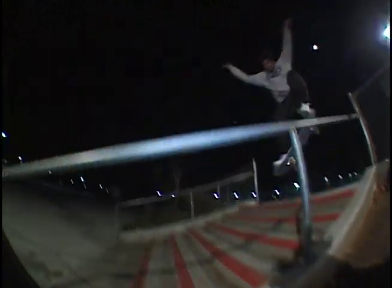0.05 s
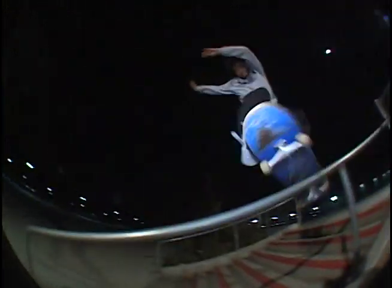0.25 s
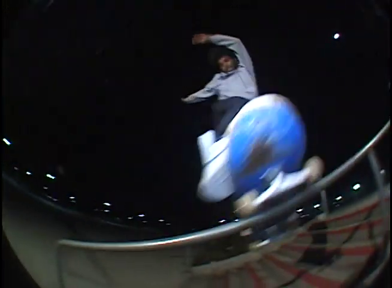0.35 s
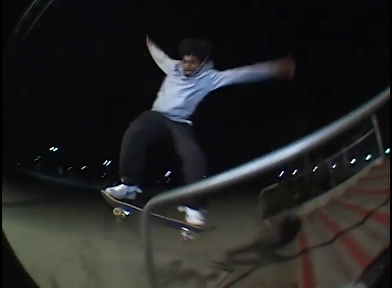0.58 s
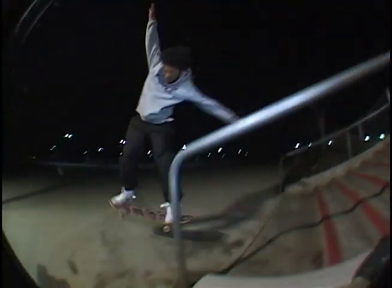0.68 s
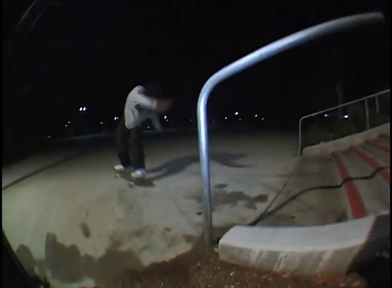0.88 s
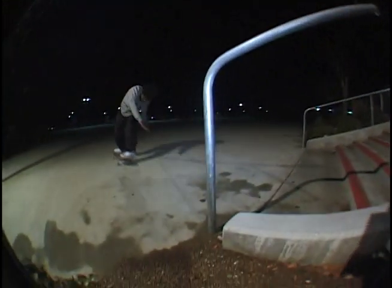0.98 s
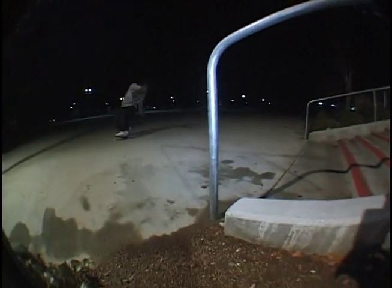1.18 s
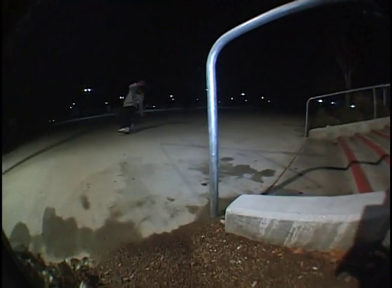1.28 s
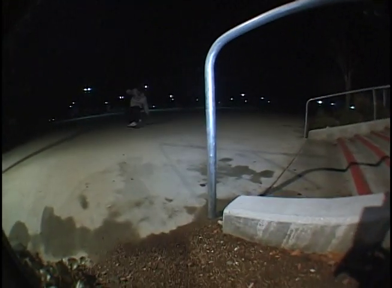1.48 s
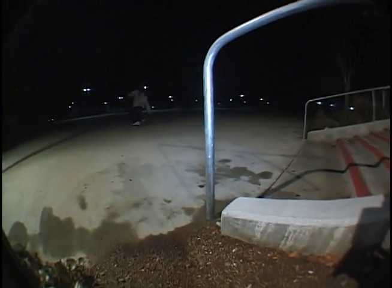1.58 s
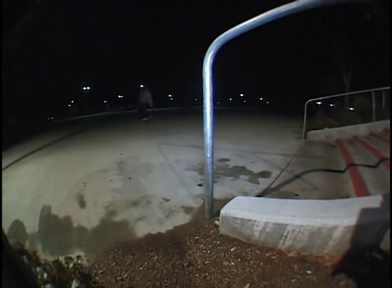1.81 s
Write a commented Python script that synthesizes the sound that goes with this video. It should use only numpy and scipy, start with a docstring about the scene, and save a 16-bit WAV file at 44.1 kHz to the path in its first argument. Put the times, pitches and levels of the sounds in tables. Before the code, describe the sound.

A skateboard passes close with whirring wheels, slams onto a steel handrail and scrapes along it. It clacks off the end, lands on concrete with a loud crack and rolls away outdoors, growing duller.

```python
"""A skateboard passes close by. Its free wheels whirr in the air and its bearings hiss. At 0.3 s the
board slams on a steel handrail, exciting the modes of both, and slides along it with friction noise.
It clacks off the end at 0.55 s, lands on concrete with a crack at 0.75 s and takes the rider's weight.
Then it rolls away: the rough ground drives the resonances of wheels and deck, ever duller.
The hardest blows overload the microphone."""
import sys
import numpy as np
from scipy import signal
from scipy.fft import rfft, irfft, next_fast_len
from scipy.io import wavfile
from scipy.ndimage import map_coordinates

SR = 44100
rng = np.random.default_rng(int(sys.argv[2]) if len(sys.argv) > 2 else 0)


def pcm_store(signal):
    """Save signal as 16-bit PCM."""
    levels = np.round(np.clip(np.atleast_2d(signal), -1, 1) * 32767)
    wavfile.write(sys.argv[1], SR, levels.astype(np.int16).T)


N = 81585
TIME = np.arange(N) / SR
TOUCHDOWN_S = 0.743

# Blows as the board meets and leaves the rail (t/s, ring level/dB, crack level/dB, crack T60/s)
RAIL_SLAMS = [(.3028, 7.5, 7.5, 0.065), (.3115, -14, -2.5, 0.054)]
RAIL_END_CLACKS = [(.5472, -15, -7, 0.033), (.5512, -1.5, -7.5, 0.016), (0.5566, -19, -16, 0.042)]
# Normal modes (f/Hz, relative level/dB, T60/s)
TRUCK_MODES = [(269, -16.5, 0.062), (487, -20, 0.062), (661, -8.5, 0.063), (800, -11, 0.058),
               (1140, -1, 0.046), (1460, 4.5, 0.034), (1754, -1, 0.022), (1850, -7, 0.041),
               (2640, -8, 0.039), (3250, -12.5, 0.026), (6150, -9, 0.032)]
DECK_MODES = [(158, -7.5, 0.06), (345, -4.5, 0.055), (445, -2.5, 0.055), (748, 3, 0.045), (912, -3.5, .035),
              (1100, 4.5, 0.034), (1460, -3, 0.03), (1620, -3, .033), (1735, 2, 0.035), (1877, -2, 0.033),
              (2358, -0.5, 0.037)]
# Spectrum of a hard blow on concrete (f/Hz, relative level/dB)
CONCRETE_CRACK = [(30, -47), (130, -14), (450, -2), (1200, 0.5), (1900, 2.5), (3000, -4.5), (3900, -10.5),
                  (6200, -8), (7600, -14.5), (9500, -17.5), (15000, -24)]


def rail_impacts():
    """Impact excitation: the board slams on the rail, then a truck clacks off its end."""
    board_modes = [(315, -0.5, 0.075), (457, -1, 0.07), (740, -1.5, 0.06), (891, -1.5, 0.09),
                   (1126, 0, 0.07), (1291, 4, 0.065), (1385, 1, 0.045), (1589, 2, 0.05), (1685, 4.5, 0.045),
                   (1949, 0, 0.039), (2200, 4, 0.04), (2798, -0.5, 0.047), (5660, -4.5, 0.085)]  # board against the rail (f/Hz, relative level/dB, T60/s)
    steel_crack = [(30, -36), (200, -38), (400, -8), (1400, 1), (2600, -8.5), (3900, -19.5), (5800, -8.5),
                   (7500, -16), (9500, -22.5), (15000, -33)]  # contact spectrum (f/Hz, relative level/dB)
    return impacts(RAIL_SLAMS, board_modes, steel_crack) + impacts(RAIL_END_CLACKS, TRUCK_MODES, steel_crack)


def landing():
    """Mass loading: tail and wheels hit concrete, then the deck rings lower under the rider's weight."""
    # Blows (t/s, ring level/dB, crack level/dB, crack T60/s)
    touchdowns = [(.7542, -0.5, 6, 0.069), (.7612, 8.5, 1.5, 0.052), (.782, -11, -5, 0.021)]
    stomps = [(.8128, -22, -15, 0.052), (.8188, -10, -8.5, 0.014), (.8235, -19, -15.5, 0.028)]
    loaded_modes = [(112, 5.5, 0.05), (143, 0.5, 0.076), (269, -9.5, 0.054), (415, -0.5, 0.052),
                    (557, 4, 0.081), (790, -12, 0.019), (1310, -2, 0.025)]  # deck under load (f/Hz, relative level/dB, T60/s)
    soft_crack = [(30, -33), (140, 3), (500, -4), (1500, -3.5), (3200, -10.5), (7000, -19), (11000, -20),
                  (15000, -38)]  # contact spectrum (f/Hz, relative level/dB)
    return impacts(touchdowns, DECK_MODES, CONCRETE_CRACK) + impacts(stomps, loaded_modes, soft_crack)


def impacts(blows, modes, spectrum):
    """Impulse response: each contact gives a modal ring and a short broadband crack."""
    out, t = np.zeros((2, N)), np.arange(SR // 4) / SR
    attack = 1 - np.exp(-t / 0.00015)
    for start, ring_db, crack_db, t60 in blows:
        crack = coloured(rng.standard_normal((2, len(t))), spectrum) * amp(crack_db - 60 * t / t60)
        add(out, start, (amp(ring_db) * ring(modes, t, scatter_db=1.5) + crack) * attack)
    return out


def ring(modes, t, scatter_db):
    """Modal superposition: damped sines, each a little out of phase between the two microphones."""
    hz, db, t60 = np.transpose(modes)[:, :, None]
    polarity = (-1) ** np.arange(len(db))[:, None]
    gain = polarity * amp(db + scatter_db * rng.standard_normal(db.shape))
    phase = 0.088 * np.sqrt(hz / 1000) * rng.standard_normal((2, *db.shape))
    partials = gain * amp(-60 * t / t60) * np.sin(2 * np.pi * hz * t + phase)
    return np.sum(partials, 1) / np.linalg.norm(amp(db)) * np.sqrt(2)


def slide():
    """Sliding friction and free spin: scrape, bearing hiss, wheel whirr and a swish before touchdown."""
    # Envelopes (t/s, relative level/dB)
    scrape_levels = [(0, -38.5), (.055, -29), (.11, -32), (.176, -35), (.184, -25), (.23, -21.5),
                     (.275, -18), (.35, -24), (.395, -27), (.42, -21), (.445, -30.5), (.48, -24.5),
                     (.53, -34.5), (.59, -38), (.66, -44), (.735, -36)]
    bearing_levels = [(0, -36), (.055, -30), (.14, -33), (.19, -28), (.27, -29), (.35, -30), (.4, -30),
                      (.45, -28), (.53, -31.5), (.59, -34), (.66, -38.5), (.735, -39.5)]
    whirr_levels = [(0, -29), (.06, -26), (.14, -33.5), (.27, -27), (.4, -30.5), (.58, -61), (.65, -35.5),
                    (.74, -41.5)]
    swish_levels = [(.655, -48), (.68, -50), (.705, -25.5), (.725, -51), (.75, -44)]
    # Noise spectra (f/Hz, relative level/dB)
    scrape_spectrum = [(100, -33), (200, -30), (270, -13.5), (400, -20.5), (520, -11), (720, -13.5),
                       (1000, -7.5), (1300, -5), (1680, -4), (2050, -7.5), (2600, -9), (3100, -19),
                       (4000, -25), (8000, -71)]
    bearing_spectrum = [(200, -40), (700, -2.5), (1760, -11), (3000, -6), (3500, 0), (3980, -13), (4400, 0),
                        (5100, -4), (6200, 0.5), (7400, -8), (8800, -2.5), (10500, -11.5), (12800, -18.5),
                        (15800, -21)]
    swish_spectrum = [(100, -23), (300, 2), (520, 15), (800, 8), (2000, -37), (8000, -39)]
    free_wheels = [(687, 76, -6.5), (978, 110, -2.5), (1084, 55, -0.5), (1196, 48, -1.5), (1750, 65, -13),
                   (2598, 390, -6)]  # resonances (f/Hz, width/Hz, relative level/dB)
    aloft, = curves([(TOUCHDOWN_S, 1), (TOUCHDOWN_S + 0.02, 0)])
    scrape = amp(curves(scrape_levels)[0]) * friction(scrape_spectrum, grain_db=2.5, rate=400)
    hiss = amp(curves(bearing_levels)[0] + 1) * friction(bearing_spectrum, grain_db=1.5, rate=980)
    whirr = amp(curves(whirr_levels)[0]) * resonances(free_wheels)
    swish = amp(curves(swish_levels)[0]) * friction(swish_spectrum, grain_db=2, rate=200)
    return aloft * (scrape + hiss + whirr + swish)


def roll():
    """Roughness excitation: hard wheels roar, whine and hiss on concrete, duller as they move off."""
    levels = [(.84, -38, -44.5), (.882, -30.5, -41.5), (.91, -35.5, -45.5), (.945, -29.5, -43),
              (1.01, -33.5, -42.5), (1.18, -31.5, -40), (1.27, -33, -40.5), (1.38, -39.5, -47),
              (1.5, -35, -44), (1.63, -36, -48), (1.85, -41.5, -50)]  # envelopes (t/s, relative roar level/dB, relative grit level/dB)
    # Spectra of wheel roar and grit hiss (f/Hz, relative level/dB)
    roar_near = [(120, -44), (200, -31), (229, -5.5), (348, -27), (389, -5.5), (440, -12), (523, -6.5),
                 (805, -2), (877, -10.5), (1030, -2.5), (1660, -2), (2210, -13), (3800, -15), (4940, -50),
                 (8360, -120)]
    roar_far = [(120, -13.5), (200, -8.5), (282, -11.5), (429, -5.5), (563, -2), (621, -7.5), (711, -7),
                (1020, -9), (1110, -10), (1710, -12), (2180, -18), (2410, -20.5), (3800, -31), (4940, -53),
                (8360, -120)]
    grit_near = [(200, -47), (1500, -15), (3000, -7.5), (3900, -12), (4450, 0.5), (4900, -3.5), (6500, -1),
                 (7500, -10.5), (8700, -2.5), (12800, -22), (15800, -22)]
    grit_far = [(1800, -26), (3000, -8.5), (4400, -4.5), (6200, -3), (7400, -7.5), (9200, -1),
                (10200, -13.5), (12500, -19), (15800, -29)]
    loaded_wheels = [(1415, 170, -1.5), (1707, 110, 5), (2550, 150, -11.5), (2790, 60, -4.5)]  # resonances (f/Hz at 1 s, width/Hz, relative level/dB)
    roar_db, grit_db = curves(levels)
    grounded, = curves([(TOUCHDOWN_S, 0), (TOUCHDOWN_S + 0.075, 1)])
    away, = curves([(1.1, 0.0038), (1.45, 0.91)])
    dull, = curves([(1.1, 0), (1.74, 1)])
    roar = np.sqrt(1 - away) * friction(roar_near, grain_db=1, rate=610)
    roar += np.sqrt(away) * friction(roar_far, grain_db=2, rate=280)
    speed = 1 - 0.05 * (TIME - 1)  # the whine sags as the board slows
    whine = amp(-6.5 - 5.8 * away) * resonances(loaded_wheels, speed)
    grit = (1 - dull) * friction(grit_near, grain_db=2.5, rate=1100)
    grit += dull * friction(grit_far, grain_db=1.5, rate=880)
    grit /= np.hypot(1 - dull, dull)
    deck = deck_hum()
    coarse_patches = amp(0.7 * (2 - dull) * wobble(rate=170))
    wheels = amp(roar_db + 1.5) * (roar + whine) + amp(grit_db + 4) * grit
    return grounded * (coarse_patches * wheels + deck)


def deck_hum():
    """Forced vibration: the rolling deck gives a rough, falling hum over its lowest bending mode."""
    glide = [(.85, 570, -38.5), (1.1, 546.3, -39.5), (1.27, 505, -33.5), (1.42, 490, -41),
             (1.6, 467.4, -38.5), (1.85, 449, -41)]  # course of the hum (t/s, f/Hz, relative level/dB)
    hz, db = curves(glide)
    wander_hz = 38.1 * wobble(rate=180)
    phase = 2 * np.pi * np.cumsum(hz + wander_hz) / SR
    hum = unit(np.sin(phase) * amp(2.8 * wobble(rate=180)))
    return amp(db - 2.5) * hum + amp(-51) * narrowband(hz=138, width_hz=86)


def rattles():
    """Light impacts: wheels and trucks knock the deck; metal and grit tick against a truck."""
    # Blows (t/s, ring level/dB, crack level/dB, crack T60/s)
    knocks = [(.054, -21.5, -19, 0.025), (.1812, -21, -18.5, 0.011), (.2055, -17, -20.5, 0.041),
              (.2618, -27, -21, 0.024), (.6992, -30, -24.5, 0.072), (1.0635, -24, -28, 0.067)]
    ticks = [(.4298, -43, -16.5, 0.013), (.5474, -38, -12, 0.0095), (.5518, -27, -17, 0.013),
             (1.0635, -39, -32, 0.052)]
    tick_crack = [(500, -28), (3000, -9), (6000, 7), (10000, 4), (15000, -15)]  # contact spectrum (f/Hz, relative level/dB)
    return impacts(knocks, DECK_MODES, CONCRETE_CRACK) + impacts(ticks, TRUCK_MODES, tick_crack)


def scuffs():
    """Slip friction: the wheels skid sideways in brief, gritty swells."""
    slips = [(0.878, -30, 0.032), (0.94, -26.5, 0.0092), (0.984, -31, 0.012)]  # Gaussian swells (t/s, level/dB, half length/s)
    spectrum = [(100, -20), (300, 3.5), (700, -30), (1300, -8), (2200, 4.5), (3200, -1.5), (4000, -15),
                (6200, -7), (12000, -23)]  # slip noise (f/Hz, relative level/dB)
    envelope = sum(amp(db) * np.exp(-((TIME - peak) / half) ** 2) for peak, db, half in slips)
    return envelope * friction(spectrum, grain_db=2.5, rate=600)


def rail_ring():
    """Free vibration: the steel tube sings faintly and unsteadily after the board meets and leaves it."""
    tube_modes = [(672, 5.5, 0.28), (1043, -1, 0.6), (1275, -3, 0.46), (2160, -2, .6), (2340, -6, 0.65),
                  (5660, -3, .3)]  # lightly damped modes (f/Hz, relative level/dB, T60/s)
    out = np.zeros((2, N))
    for start in (RAIL_SLAMS[0][0], RAIL_END_CLACKS[0][0]):
        flutter_db = 3 * wobble(rate=60)
        add(out, start, amp(-31 + flutter_db) * ring(tube_modes, TIME, scatter_db=1))
    return out


def passing(x):
    """Level and time differences between the microphones follow the board's direction."""
    path = [(0, -4, 0.089), (.24, -3.5, 0.067), (.31, -4.5, 0.071), (.44, 0, 0.014), (.55, 2, -0.037),
            (.77, 1.5, -0.031), (1.05, 3.5, -0.063), (1.85, 2.5, -0.052)]  # direction cues (t/s, left minus right level/dB, left lag/ms)
    pan_db, lag_ms = curves(path)
    half_lag = lag_ms * SR / 2000
    return np.array([amp(side * pan_db / 2) * map_coordinates(ch, [np.arange(N) - side * half_lag], order=5)
                     for ch, side in zip(x, (1, -1))])


def yard(x):
    """Reverberation: reflections from steps and walls merge into an exponentially decaying tail."""
    decay_times = [(200, 0.3), (2000, 0.33), (10000, 0.9)]  # reverberation time (f/Hz, T60/s)
    hz, t, noise = signal.stft(rng.standard_normal((2, SR // 2)), SR, nperseg=256)
    tail = signal.istft(noise * amp(-60 * t / along(decay_times, hz)[:, None]), SR, nperseg=256)[1]
    return signal.fftconvolve(x, tail / np.linalg.norm(tail[0]), axes=1)[:, :N]


def rumble():
    """Background noise: a low band whose level drifts."""
    levels = [(0, -35.5), (.25, -43), (.38, -37), (.48, -40.5), (.6, -40.5), (.72, -48), (1.0, -53),
              (1.3, -49), (1.85, -54)]  # envelope (t/s, level/dB)
    spectrum = [(20, -21), (45, 4), (72, 5), (100, -3.5), (145, 2), (200, -8.5), (350, -9), (900, -55)]  # low band (f/Hz, relative level/dB)
    return amp(curves(levels)[0]) * friction(spectrum, grain_db=1.5, rate=15)


def friction(spectrum, grain_db, rate):
    """Source and filter: countless tiny contacts, bunched rate times a second, heard through a body."""
    return coloured(rng.standard_normal((2, N)) * amp(grain_db * wobble(rate)), spectrum)


def resonances(rows, speed=1):
    """Superposition of narrow bands, rms 1, with frequencies proportional to speed."""
    return unit(sum(amp(db) * narrowband(hz * speed, width) for hz, width, db in rows))


def narrowband(hz, width_hz):
    """A randomly driven resonance: a carrier that drifts in amplitude and phase."""
    phase = 2 * np.pi * np.cumsum(hz * np.ones(N)) / SR
    return unit(wobble(width_hz) * np.cos(phase) + wobble(width_hz) * np.sin(phase))


def coloured(pair, spectrum):
    """Partial coherence: two independent noises mix to a left and right of this spectrum, rms 1."""
    coherence = [(40, 0.99), (130, 1), (500, 1), (1200, 0.86), (2500, 0.69), (5000, 0.42), (12000, 0.63)]  # likeness of left and right (f/Hz, correlation)

    def response(hz):
        angle = np.arccos(np.clip(along(coherence, hz), -1, 1)) / 2
        return amp(along(spectrum, hz)) * np.array([np.cos(angle), np.sin(angle)])

    mid, side = filtered(pair, response)
    return unit(np.array([mid + side, mid - side]))


def filtered(x, response):
    """Linear filtering: the spectrum of x times a frequency response."""
    n = x.shape[-1]
    padded = next_fast_len(n + 8192)
    return irfft(rfft(x, padded) * response(np.fft.rfftfreq(padded, 1 / SR)), padded)[..., :n]


def wobble(rate):
    """Random modulation: a smooth curve with rate knots a second."""
    return map_coordinates(rng.standard_normal(N // 8), [TIME * rate], mode="wrap")


def curves(rows):
    """Linear interpolation in time: one value per sample for each column after the first."""
    times, *columns = np.transpose(rows)
    return [np.interp(TIME, times, column) for column in columns]


def along(points, hz):
    """Interpolation of (f/Hz, value) points on a logarithmic frequency axis."""
    f, values = np.transpose(points)
    return np.interp(np.log(hz + 1), np.log(f + 1), values)


def add(out, start, sound):
    """Superposition of a sound from start seconds on."""
    part = out[:, round(start * SR):][:, :sound.shape[-1]]
    part += sound[..., :part.shape[1]]


def amp(db):
    """Level in decibels to amplitude ratio."""
    return 10 ** (np.asarray(db) / 20)


def unit(x):
    """Normalisation to rms 1."""
    return x / np.sqrt(np.mean(x ** 2) + 1e-20)


def scene():
    """Radiation from a moving board, too small to give deep bass, in an open yard over a low rumble."""
    low_cut = signal.butter(2, 69, "high", fs=SR, output="sos")
    hits = signal.sosfilt(low_cut, rail_impacts() + landing() + rattles())
    board = passing(hits + rail_ring() + slide() + roll() + scuffs())
    return board + amp(-30) * yard(board) + rumble()


def record(dry):
    """Saturation and band limiting: the microphone clips softly, then deep bass and top treble are cut."""
    knee, bass_hz, top_hz = 7, 77.5, 15900
    clipped = dry / (1 + np.abs(dry) ** knee) ** (1 / knee)
    return filtered(clipped, lambda hz: (hz < top_hz) * hz ** 2 / (hz ** 2 + bass_hz ** 2))


dry = scene()
out = record(dry)
pcm_store(out)
```